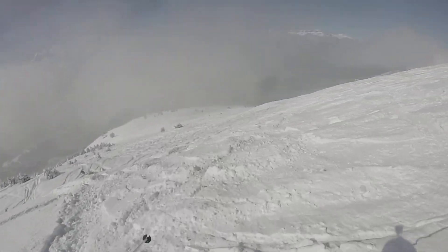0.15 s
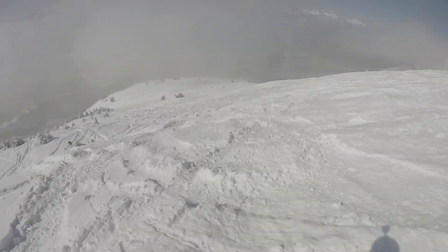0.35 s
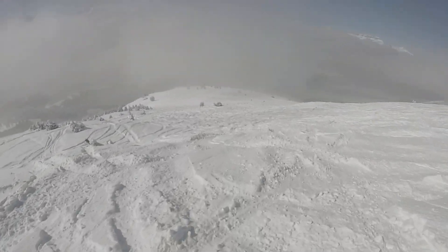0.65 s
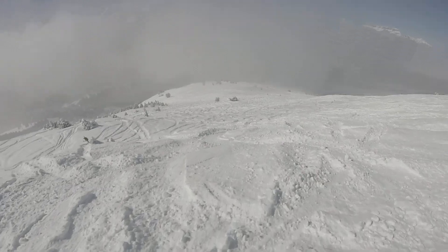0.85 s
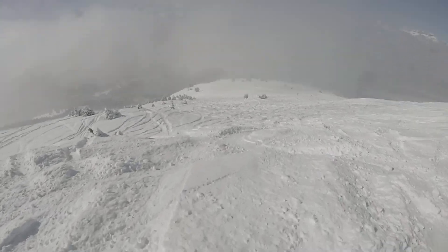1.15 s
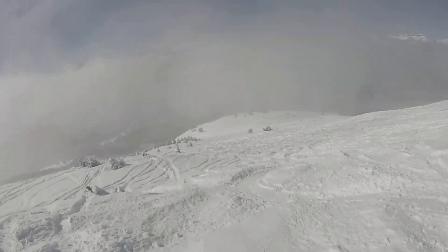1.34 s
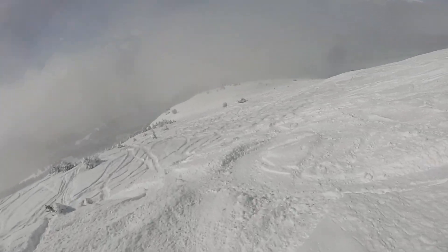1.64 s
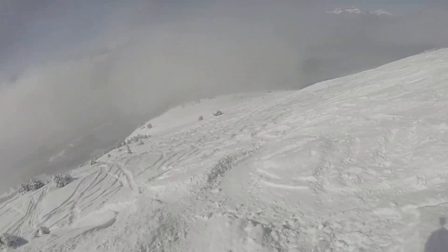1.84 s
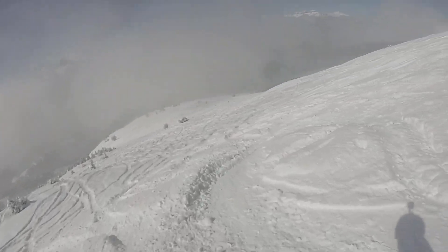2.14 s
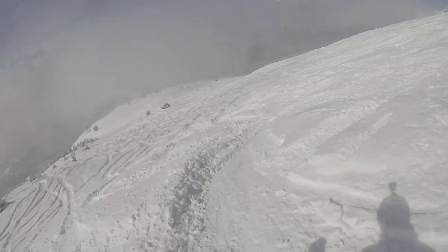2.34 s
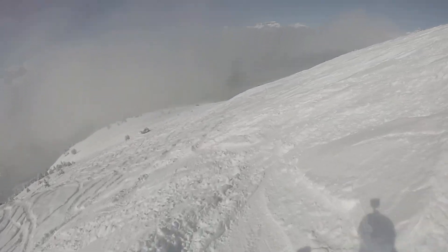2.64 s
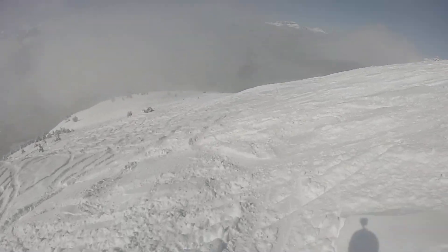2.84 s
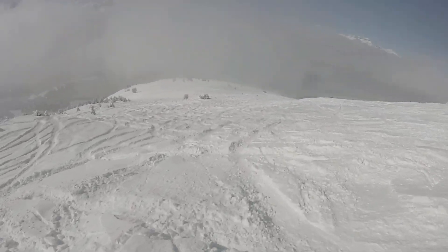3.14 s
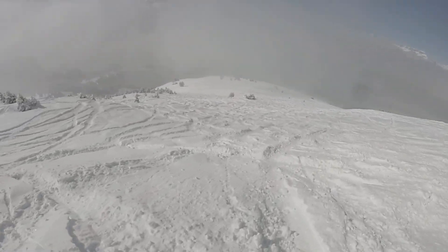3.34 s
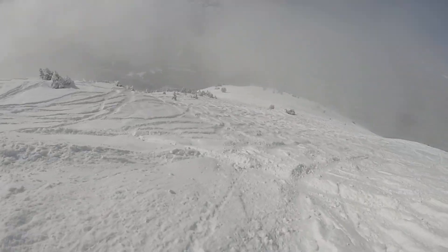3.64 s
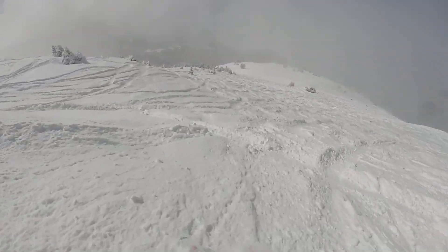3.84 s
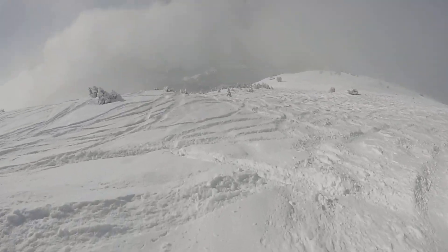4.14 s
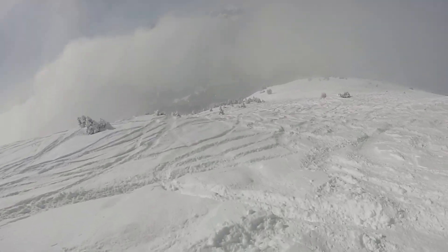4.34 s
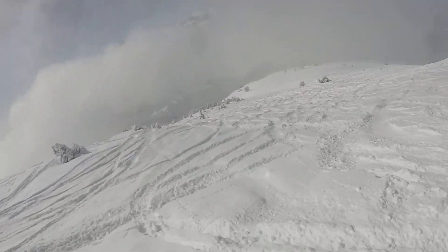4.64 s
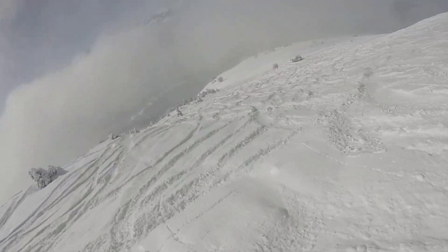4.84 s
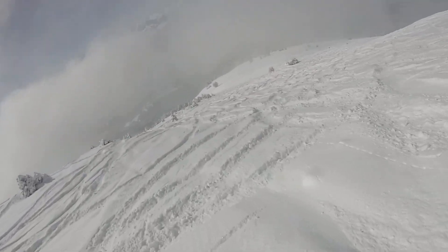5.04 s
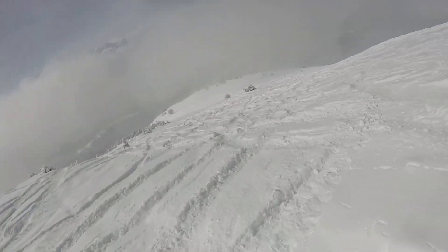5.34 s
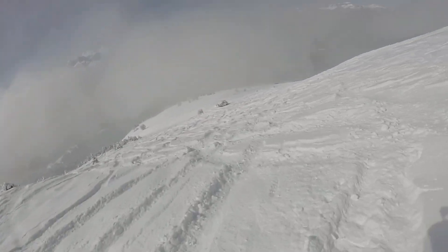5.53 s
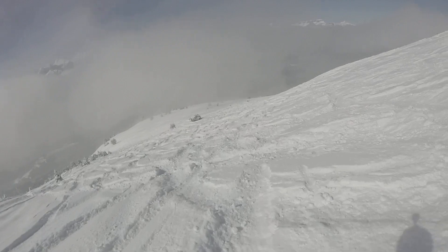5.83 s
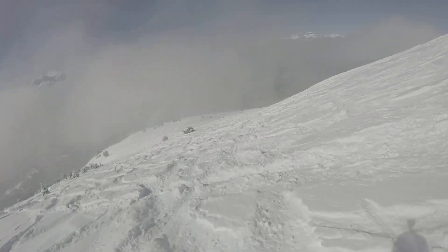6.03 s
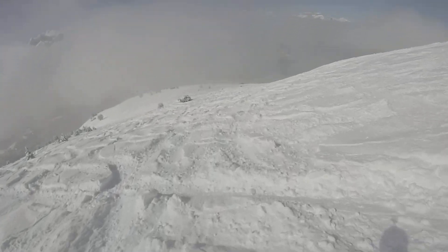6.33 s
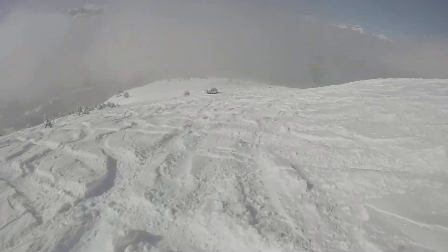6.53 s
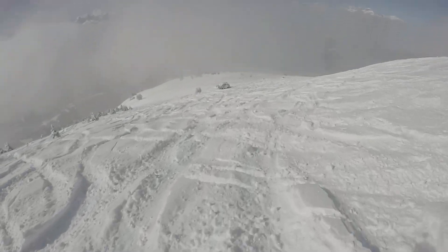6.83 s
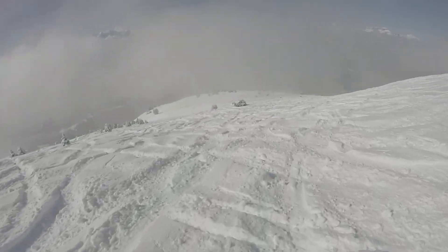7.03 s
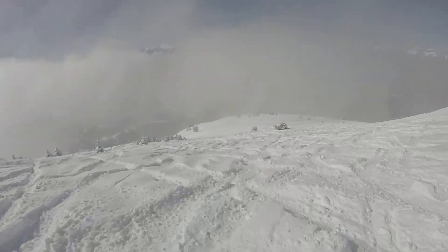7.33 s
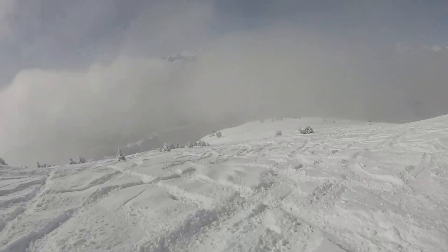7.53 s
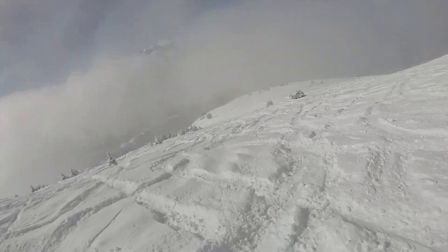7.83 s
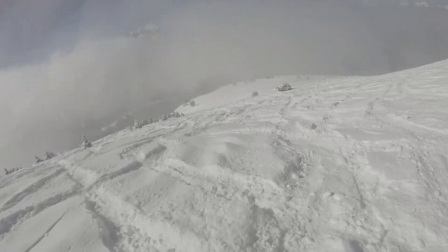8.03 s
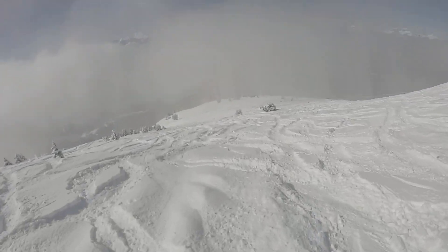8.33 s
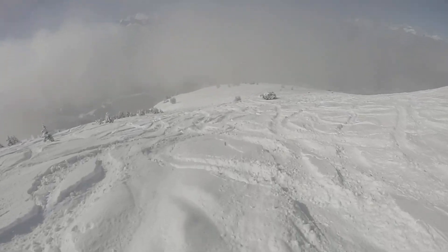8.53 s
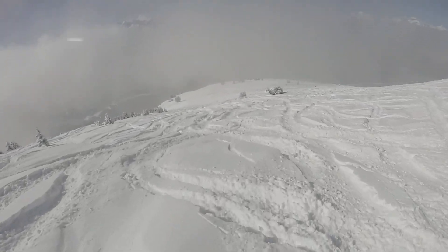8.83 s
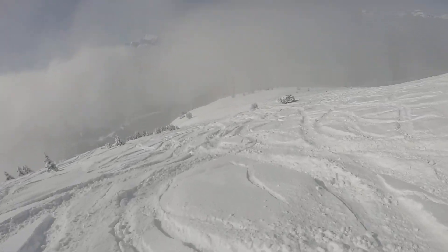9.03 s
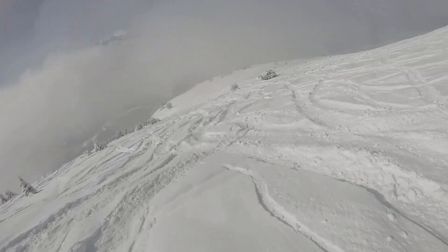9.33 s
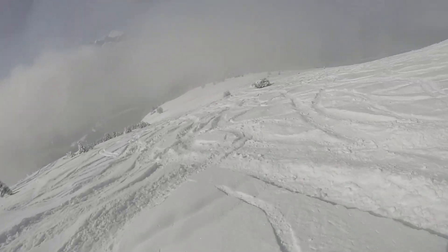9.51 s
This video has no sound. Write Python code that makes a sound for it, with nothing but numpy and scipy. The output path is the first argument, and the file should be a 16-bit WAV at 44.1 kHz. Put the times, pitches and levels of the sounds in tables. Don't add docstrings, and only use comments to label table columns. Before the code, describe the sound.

Close, muffled, boxy sound of skis gliding through broken snow on a mountainside. Edge hiss comes in uneven half-second strokes, with thin crackling spray and deep gusts pressing on the plastic casing. Several low thumps shake the mount, strongest just after a hard ice knock at 3.5 seconds. Later, hollow strokes continue with sharper plastic ticks, tiny taps, and one last strong bump near 8.1.

```python
import sys
import numpy as np
from scipy import signal
from scipy.fft import rfft, irfft
from scipy.io import wavfile
from scipy.ndimage import uniform_filter1d

SR = 44100
rng = np.random.default_rng(int(sys.argv[2]) if len(sys.argv) > 2 else 0)


def convert_level_to_amplitude(level_db):
    exponent = np.asarray(level_db, float) / 20
    return 10 ** exponent


def master(y):
    cut = np.clip(np.atleast_2d(y).T, -1, 1)
    pcm = np.round(cut * 32767)
    wavfile.write(sys.argv[1], SR, pcm.astype(np.int16))


N = 426447

# pitch_hz, level_db (per Hz)
BUFFET_SPECTRUM = [(6, 16.5), (14, 16), (30, 5), (48, 4), (70, -7.5), (110, -28), (250, -57)]
# start_s, length_s, level_db
GUSTS = [(0.175, 0.51, -38.5), (0.845, .55, -37.5), (1.507, 0.16, -49), (1.906, 0.16, -42.5),
         (2.252, 0.25, -36.5), (2.62, 0.21, -33.5), (3.42, 0.27, -33.5), (3.704, 0.21, -34),
         (4.0, .18, -44), (4.392, .14, -45), (4.68, 0.15, -45), (5.073, 0.21, -39.5), (5.62, 0.28, -35.5),
         (5.99, 0.85, -43), (6.9, 0.32, -37.5), (7.348, 0.097, -35), (7.548, 0.29, -40.5),
         (8.046, 0.17, -33.5), (8.304, 0.23, -43), (8.74, .3, -40.5), (9.134, .24, -48)]
# start_s, length_s, pitch_hz, level_db
CREAKS = [
    (1.65, .04, 3250, -46),
    (3.93, .03, 1550, -53),
    (4.3, .2, 800, -59),
    (4.345, .045, 3100, -48),
    (5.24, .05, 4500, -56),
    (7.47, .12, 1650, -61),
    (8.33, .08, 1600, -58),
    (8.615, .04, 3450, -50),
    (8.99, .1, 1620, -57),
    (9.12, .08, 3200, -54),
]
# start_s, peak_db
TICKS = [(0.086, -31), (0.4424, -26.5), (0.987, -35.5), (1.1195, -31), (1.3268, -37), (2.2532, -34),
         (2.49, -35), (2.7254, -32.5), (2.9022, -34.5), (3.788, -38), (4.074, -32.5), (4.8186, -30.5),
         (5.421, -35), (5.7358, -30), (5.8106, -29.5), (6.2872, -27), (6.4923, -22.5), (6.9166, -25),
         (7.0424, -33), (7.3842, -26.5), (7.4597, -22.5), (7.5892, -29.5), (8.082, -28), (8.3407, -22.5),
         (9.0937, -22)]
# pitch_hz, level_db, t60_s
LATCH_MODES = [(1630, -11, 0.0073), (1930, -19, 0.014), (2733, 2, 0.015), (3180, -12.5, 0.033),
               (3970, -19, 0.017), (4790, -13.5, 0.018), (6300, -31, 0.0068), (9500, -20.5, 0.0025),
               (13000, -31, 0.0036)]
# start_s, top_db, tap_hz, shell_db
GRAINS = [(0.4254, -43, 11100, -44), (0.8773, -43, 13400, -55), (1.038, -43, 13000, -51.5),
          (2.5109, -35, 9900, -40.5), (2.847, -37, 9500, -43.5), (2.998, -50, 9170, -53),
          (3.1413, -44, 9000, -53), (3.3425, -43, 13000, -49), (3.392, -43, 9110, -60),
          (3.6273, -30, 14900, -44.5), (3.762, -31.5, 14900, -45.5), (3.878, -45, 13000, -52),
          (4.5264, -41, 9090, -51), (4.6473, -38, 9080, -50), (4.7713, -40, 12800, -52),
          (5.0713, -40, 9100, -58), (5.1098, -49, 10500, -50), (5.3435, -41, 9500, -51),
          (5.7173, -42, 9700, -55), (6.0577, -46, 9200, -54), (6.8757, -36, 14300, -48),
          (6.9917, -27, 14500, -43.5), (7.121, -27, 14800, -42), (7.4147, -45, 9420, -47.5),
          (7.972, -44, 11400, -54), (8.1403, -45, 11200, -47.5), (8.272, -42, 9690, -48),
          (8.964, -33, 14900, -49), (8.981, -44, 14800, -48), (9.189, -45, 14600, -51)]
# pitch_hz, level_db, t60_s
SHELL_MODES = [(4700, 3.5, 0.0039), (5740, -1.5, 0.0073), (6550, -3.5, 0.01), (6780, 5, 0.003)]
# pitch_hz, level_db, t60_s
SHELL_TOP_MODES = [(9500, -9.5, 0.0017), (11200, -19.5, 0.0036), (13200, -9, 0.0037), (15800, -11, .003)]
# pitch_hz, level_db, t60_s
BODY_MODES = [(1820, -11.5, 0.012), (2440, -1, 0.0017), (3290, -8, 0.017), (4100, -14, 0.012)]
LUMP_S = np.array([3.5445, 3.5467])
LUMP_DB = np.array([-30, -25])
# pitch_hz, level_db, t60_s
LUMP_MODES = [(1050, -8, .008), (2430, -6, .008), (3260, 9.5, 0.0073), (4800, 7.5, 0.0083),
              (5780, 7.5, 0.0056), (6700, -8, 0.0067), (7400, -2, 0.0038), (9500, 5.5, 0.0014),
              (10500, -19, 0.0041)]
# start_s, mount_ring_db, helmet_sway_db
BUMPS = [(0.23, -25, -35), (0.328, -36, -40), (0.665, -31, -66), (0.862, -38, -34.5), (0.958, -24.5, -31.5),
         (1.045, -19, -38), (1.237, -7.5, -25), (2.395, -7, -25), (2.662, -18.5, -30.5),
         (2.985, -35.5, -42.5), (3.223, -32.5, -64), (3.466, -22.5, -35.5), (3.64, 2, -15),
         (3.889, -6.5, -22), (4.655, -52, -35.5), (5.327, -31, -58), (5.595, -24, -35),
         (6.382, -17.5, -35.5), (6.728, -32.5, -57), (6.928, -31.5, -43), (7.148, -23, -50),
         (8.067, -21, -25.5), (8.126, -8, -26)]
# pitch_hz, level_db, t60_s
KNOCK_MODES = [(300, 1.5, 0.017), (613, -17.5, 0.014), (791, 0, 0.037), (1010, -0.5, 0.019),
               (1475, 2, 0.013), (1750, -5, 0.015), (2110, -13, 0.0092), (4360, -1.5, 0.011)]
# start_s, level_db
SPRAY_FLOW = [(0.0, -73), (0.54, -75.5), (0.91, -72.5), (1.43, -74), (2.15, -72.5), (2.64, -67),
              (2.96, -68.5), (3.26, -67.5), (4.25, -72), (4.87, -68), (6.08, -69), (6.57, -76),
              (7.76, -74.5), (8.27, -72), (8.51, -75.5), (9.67, -70)]
# pitch_hz, level_db (per Hz)
SPRAY_SPECTRUM = [(3200, -34), (4500, -7.5), (6000, -15.5), (7200, -9.5), (7900, -18), (8600, -15.5),
                  (9500, -15), (12000, -16), (15100, -18), (15500, -30), (16400, -50)]
# pitch_hz, level_db (per Hz)
SWISH_SPECTRUM = [(88, -4), (150, -4.5), (216, -7), (504, -14), (789, -12.5), (1390, -13.5), (1600, -11),
                  (1860, -12), (2020, -14), (2500, -16.5), (3250, -24), (5500, -120)]
# start_s, length_s, edge_db, crest (share of length 0-1), base_over_edge_db
STROKES = [(-.15, 0.48, -42, 0.79, -3), (0.548, 0.41, -44, 0.62, -3.5), (0.978, 0.28, -51, 1, -7),
           (1.396, 0.086, -47, 0.35, -1.5), (1.516, 0.28, -43, 0.17, -6), (1.768, 0.56, -43, .7, -10.5),
           (2.31, 0.29, -48.5, .6, -1.5), (2.57, 0.24, -42.5, 0.05, -3.5), (2.865, 0.32, -53, 0.1, 1),
           (3.074, 0.37, -46, 0.44, -2), (3.52, 0.13, -52.5, 0.04, 0.5), (3.813, 0.12, -52.5, 0.9, -5),
           (4.25, 0.28, -52.5, 0.8, -2), (4.492, 0.39, -46, 0.26, -5), (4.824, 0.36, -43, 0.28, -3.5),
           (5.237, 0.49, -42, 0.52, -4.5), (5.752, 0.6, -39.5, 0.46, -4.5), (6.38, 0.35, -53.5, 0.3, 1),
           (6.651, 0.41, -46, 0.66, -2.5), (7.08, 0.64, -57.5, 0, -2), (7.643, 0.37, -45.5, 0.5, -4),
           (8.07, 0.54, -55, 1, -0.5), (8.615, 0.38, -46.5, 0.6, -13), (9.228, 0.38, -41, 0.64, -4)]
# pitch_hz, width_hz, level_db
EDGE_PEAKS = [(3058, 200, 1), (3325, 292, 2.5), (4390, 970, -15.5), (5890, 430, -18), (7280, 1000, -32)]
# pitch_hz, width_hz, level_db
BASE_PEAKS = [(1631, 143, -9), (2004, 88, 0), (2357, 420, -6.5)]


def rms_one(x):
    return x / np.sqrt(np.mean(x ** 2) + 1e-20)


def drift(rate):
    r = np.exp(-80 * np.pi * rate / SR)
    slow = signal.lfilter([1], [1, -2 * r, r * r], rng.standard_normal(N // 40 + 2002))
    slow = rms_one(slow[2000:])
    return np.interp(np.arange(N) / 40, np.arange(len(slow)), slow)


def colour(x, spectrum):
    hz, level_db = np.transpose(spectrum)
    grid = np.maximum(np.arange(N // 2 + 1) * SR / N, 1)
    gain = convert_level_to_amplitude(np.interp(np.log(grid), np.log(hz), level_db))
    return rms_one(irfft(rfft(x) * gain, N))


def band(x, low_hz, high_hz):
    return signal.sosfilt(signal.butter(2, [low_hz, high_hz], "band", fs=SR, output="sos"), x)


def ring(x, hz, t60):
    r, w = convert_level_to_amplitude(-60 / (t60 * SR)), 2 * np.pi * hz / SR
    return signal.lfilter([0, np.sin(w)], [1, -2 * r * np.cos(w), r * r], x + 1e-18)


def resonate(x, hz, width_hz):
    r = np.exp(-np.pi * width_hz / SR)
    top = (1 - r * r) / 2
    return signal.lfilter([top, 0, -top], [1, -2 * r * np.cos(2 * np.pi * hz / SR), r * r], x)


def clicks(times, heights):
    out = np.zeros(N)
    out[np.clip(np.round(np.asarray(times) * SR).astype(int), 0, N - 1)] = heights
    return out


def strike(times, peak_db, modes, scatter_db, touch_s):
    shape = (len(times), len(modes))
    own = convert_level_to_amplitude(scatter_db * rng.standard_normal(shape)) * rng.choice([-1, 1], shape)
    swell = 2 * (1 - convert_level_to_amplitude(-60 / (touch_s * SR)))
    out = np.zeros(N)
    for k, (hz, level_db, t60) in enumerate(modes):
        hits = clicks(times, swell * convert_level_to_amplitude(peak_db + level_db) * own[:, k])
        contact = ring(hits, hz, touch_s)
        out += ring(contact, hz, t60)
    return out


def puff(times, peak_db, t60, low_hz, high_hz):
    fade = signal.lfilter([1], [1, -convert_level_to_amplitude(-60 / (t60 * SR))], clicks(times, convert_level_to_amplitude(peak_db)))
    return band(fade * rng.standard_normal(N), low_hz, high_hz)


def crystals(per_s, spread_db):
    sizes = convert_level_to_amplitude(spread_db * np.minimum(rng.exponential(1, N), 4)) * rng.choice([-1, 1], N)
    return rms_one(sizes * (rng.random(N) < per_s / SR))


def swells(start, length, peak_db, crest, sag_db, rise_db_per_s, fade_db_per_s, rest_db):
    time = np.arange(0, N, 64) / SR
    columns = start, length, peak_db, np.clip(crest, .05, .95)
    start, length, peak_db, crest = [np.reshape(c, (-1, 1)) for c in columns]
    share = np.clip((time - start) / length, 0, 1)
    away = np.where(share < crest, (crest - share) / crest, (share - crest) / (1 - crest))
    before_db = rise_db_per_s * np.maximum(start - time, 0)
    after_db = fade_db_per_s * np.maximum(time - start - length, 0)
    power = convert_level_to_amplitude(peak_db - sag_db * away ** 2 - before_db - after_db) ** 2
    level_db = 10 * np.log10(power.sum(axis=0) + convert_level_to_amplitude(rest_db) ** 2)
    return np.interp(np.arange(N) / SR, time, level_db)


def buffeting():
    level_db = swells(*np.transpose(GUSTS), crest=0.76, sag_db=6.5,
                      rise_db_per_s=86, fade_db_per_s=86, rest_db=-48.5)
    push = colour(rng.standard_normal(N), BUFFET_SPECTRUM)
    swing = np.sqrt(uniform_filter1d(push ** 2, size=6000) + .05)
    return convert_level_to_amplitude(level_db + 7.0) * rms_one(push / swing ** 0.95)


def strap():
    time, rub = np.arange(N) / SR, rng.standard_normal(N)
    out = np.zeros(N)
    for s, length, hz, level_db in CREAKS:
        creak = rms_one(resonate(resonate(rub, hz, 110), hz, 160))
        arch = np.sin(np.pi * np.clip((time - s) / length, 0, 1))
        out += convert_level_to_amplitude(level_db) * creak * arch
    return out


def latch():
    s, peak_db = np.transpose(TICKS)
    tick = strike(s - .0004, peak_db + 1.35, LATCH_MODES, scatter_db=0.2, touch_s=0.0013)
    snap = puff(s, peak_db - 7.5, 0.011, 2000, 4700)
    return band(tick, 670, 15000) + snap


def ice_grains():
    s, top_db, tap_hz, shell_db = np.transpose(GRAINS)
    top = strike(s, top_db + 5.0, SHELL_TOP_MODES, scatter_db=3.2, touch_s=0.0017)
    after = np.arange(256) / SR
    rounded = np.sin(np.pi * after / after[-1]) ** 0.31
    for start, level_db, hz in zip(s, top_db, tap_hz):
        at = round(start * SR)
        fade = convert_level_to_amplitude(level_db + 2.5 - 60 * after / 0.0044)
        top[at:at + 256] += fade * rounded * np.sin(2 * np.pi * hz * after)
    shell = strike(s, shell_db + 4.0, SHELL_MODES, scatter_db=1.5, touch_s=0.00046)
    cavity_db = shell_db + 11.5
    cavity = strike(s, cavity_db + 8.0, BODY_MODES, scatter_db=-1.1, touch_s=0.00052)
    return band(top, 8000, 21000) + band(shell, 4000, 10600) + band(cavity, 620, 4500)


def ice_lump():
    return strike(LUMP_S, LUMP_DB, LUMP_MODES, scatter_db=0, touch_s=.0025)


def tremor(press_db):
    s, ring_db, _ = np.transpose(BUMPS)
    aftershake_db, aftershake_t60_s = -38.5, 0.5
    keep = convert_level_to_amplitude(-60 / (aftershake_t60_s * SR))
    after = signal.lfilter([1], [1, -keep], clicks(s, convert_level_to_amplitude(ring_db + aftershake_db)))
    return 20 * np.log10(after + convert_level_to_amplitude(-58 + 0.2 * press_db))


def mount(tremor_db):
    mount_hz, sway_hz, cushion_hz = 130.8, 39.5, 182
    s, ring_db, sway_db = np.transpose(BUMPS)
    start = s - .0006
    sway = ring(clicks(start, convert_level_to_amplitude(sway_db + 7.0)), sway_hz, 0.27)
    thump = sway - ring(clicks(start, convert_level_to_amplitude(ring_db - 1.5)), mount_hz, 0.097)
    jolts = ring(rng.standard_normal(N) * convert_level_to_amplitude(0.65 * drift(7.7)), mount_hz, 0.22)
    shake = thump + convert_level_to_amplitude(tremor_db + 2.04) * rms_one(jolts)
    soft = signal.butter(5, cushion_hz, fs=SR, output="sos")
    knock_db = -37 + 1.2 * ring_db
    knock = strike(s - .0015, knock_db + 4.5, KNOCK_MODES, scatter_db=-0.7, touch_s=0.0045)
    knock += strike(s + 0.00314, knock_db + 8.0, KNOCK_MODES[:-1], scatter_db=0.0, touch_s=0.0042)
    crunch = puff(s + 0.0012, knock_db + 12, 0.039, 500, 2300)
    return signal.sosfilt(soft, shake) + band(knock, 245, 5400) + crunch


def spray():
    level_db = np.interp(np.arange(N) / SR, *np.transpose(SPRAY_FLOW))
    grains = crystals(520 * convert_level_to_amplitude(4.1 * drift(7)), spread_db=4.4)
    pitches, dealt = np.geomspace(4800, 14500, 9), rng.integers(0, 9, N)
    crackle = sum(ring(grains * (dealt == k), hz, 22.0 / hz) for k, hz in enumerate(pitches))
    patter = rms_one(band(crackle + 1.3 * grains, 3950, 17000))
    thin = rng.standard_normal(N) * convert_level_to_amplitude(0.98 * drift(25))
    powder = colour(0.44 * thin + patter, SPRAY_SPECTRUM)
    top = signal.cheby2(10, 45, 16300, fs=SR, output="sos")
    return convert_level_to_amplitude(level_db + 8.5) * signal.sosfilt(top, powder)


def swish(press_db):
    level_db = -58 + 0.22 * press_db + 4.5 + 1.42 * drift(13.3)
    return convert_level_to_amplitude(level_db) * colour(rng.standard_normal(N), SWISH_SPECTRUM)


def stroke_levels():
    s, length, edge_db, crest, base_over_edge_db = np.transpose(STROKES)
    motion = dict(sag_db=6.5, rise_db_per_s=260, fade_db_per_s=218, rest_db=-62)
    carve_db = swells(s, length, edge_db, crest, **motion)
    flat_db = swells(s, length, edge_db + base_over_edge_db, crest, **motion)
    return carve_db, flat_db


def housing(source, peaks):
    out = np.zeros(N)
    for k, (hz, width_hz, top_db) in enumerate(peaks):
        out += (-1) ** k * resonate(source, hz, width_hz) * convert_level_to_amplitude(top_db + 0.8 * drift(2.9))
    return out


def hiss(edge_db, base_db):
    source = rng.standard_normal(N) + 0.41 * crystals(1700, spread_db=12.5)
    source = source * convert_level_to_amplitude(1.15 * drift(10) + 0.87 * drift(68))
    edge = rms_one(band(housing(source, EDGE_PEAKS), 2060, 10300))
    base = rms_one(band(housing(source, BASE_PEAKS), 830, 3700))
    return convert_level_to_amplitude(edge_db - 0.01) * edge - convert_level_to_amplitude(base_db - 1.05) * base


def scene():
    carve_db, flat_db = stroke_levels()
    press_db = flat_db - flat_db.mean()
    wind_and_strap = buffeting() + strap()
    hits = latch() + ice_grains() + ice_lump() + mount(tremor(press_db))
    snow = spray() + swish(press_db) + hiss(carve_db, flat_db)
    return (wind_and_strap + hits + snow)[None]


def top_cut(x):
    return signal.sosfilt(signal.butter(12, 15450, fs=SR, output="sos"), x)


def record(dry):
    heard = signal.sosfilt(signal.butter(8, 16100, fs=SR, output="sos"), dry)
    return top_cut(np.clip(heard, -1, 1))


dry = scene()
out = record(dry)
master(out)
```